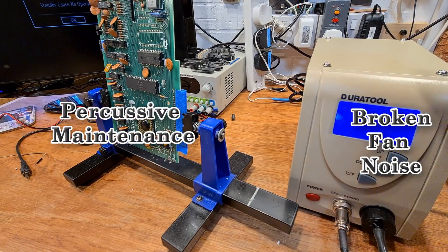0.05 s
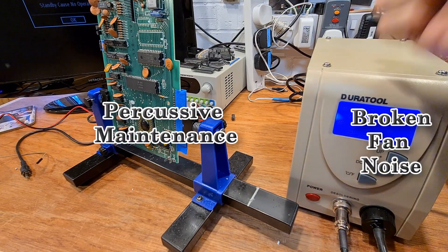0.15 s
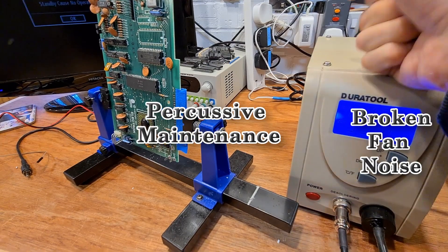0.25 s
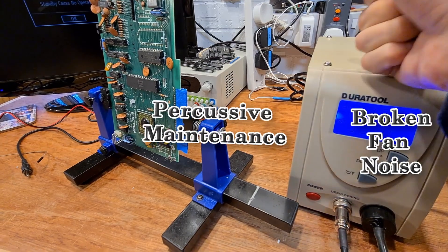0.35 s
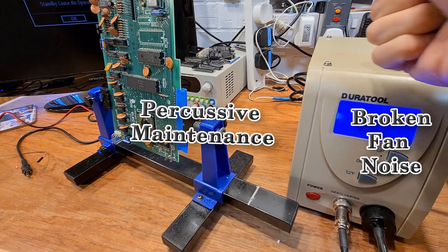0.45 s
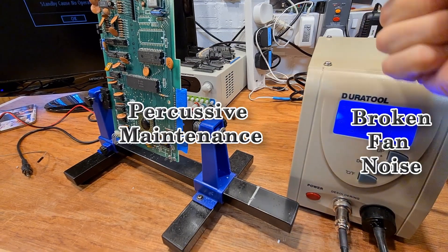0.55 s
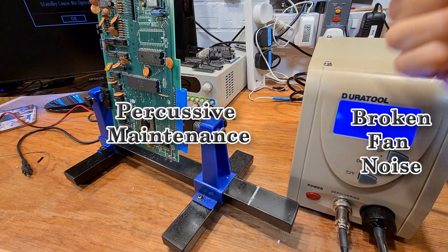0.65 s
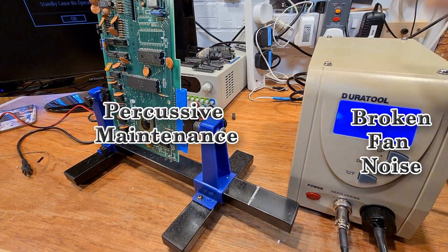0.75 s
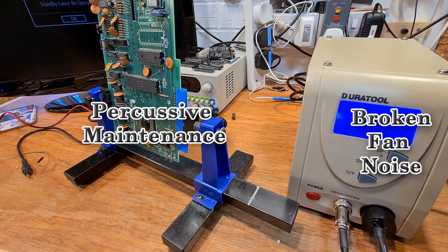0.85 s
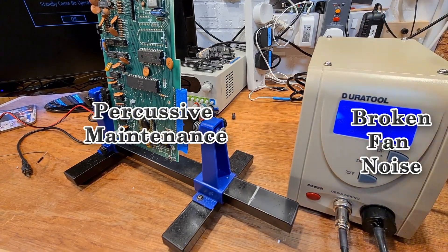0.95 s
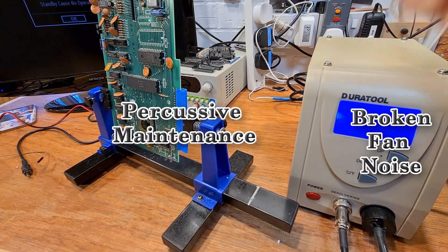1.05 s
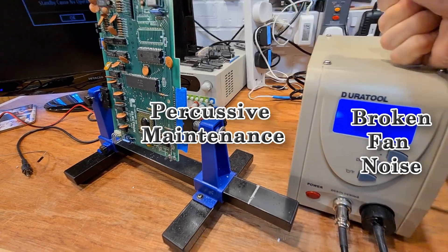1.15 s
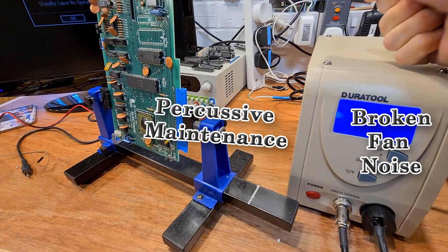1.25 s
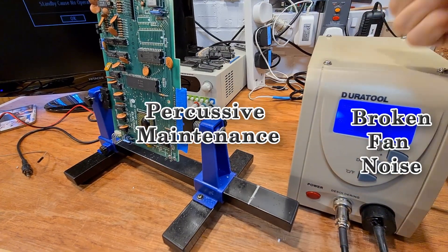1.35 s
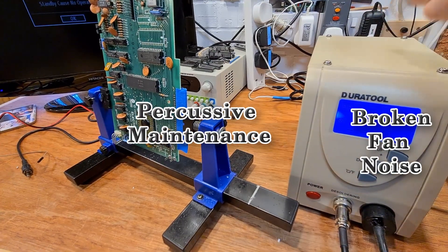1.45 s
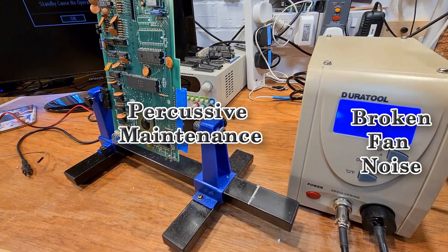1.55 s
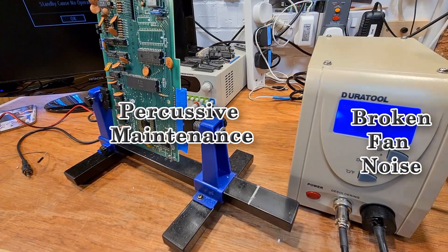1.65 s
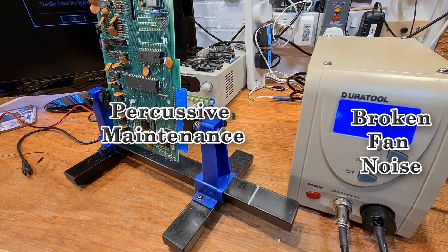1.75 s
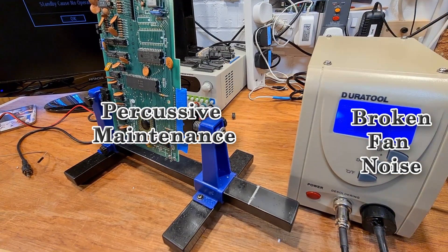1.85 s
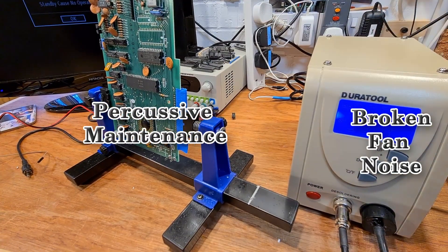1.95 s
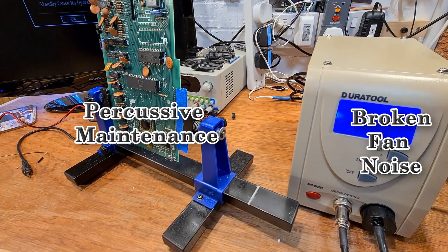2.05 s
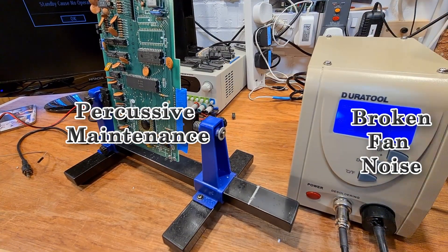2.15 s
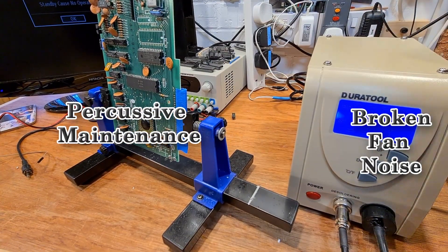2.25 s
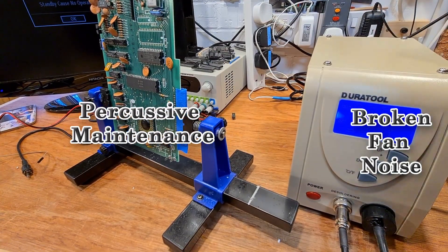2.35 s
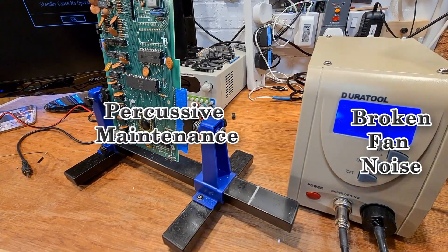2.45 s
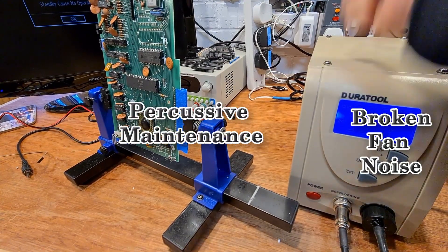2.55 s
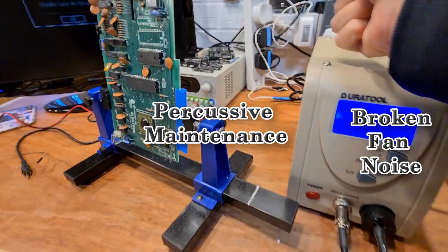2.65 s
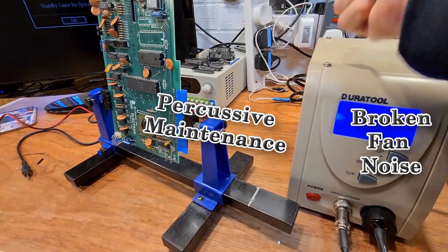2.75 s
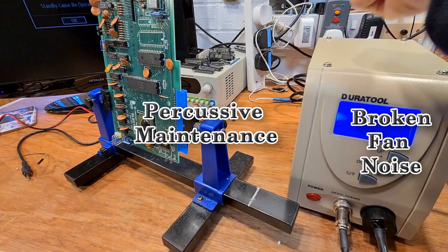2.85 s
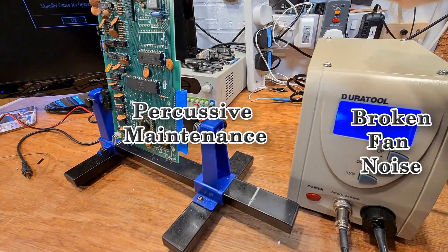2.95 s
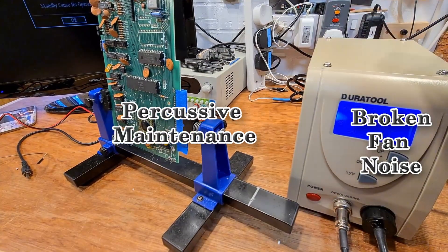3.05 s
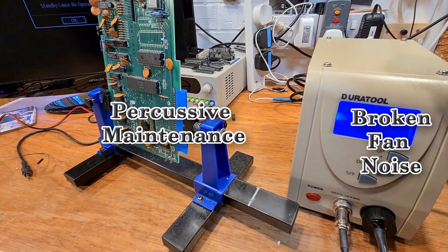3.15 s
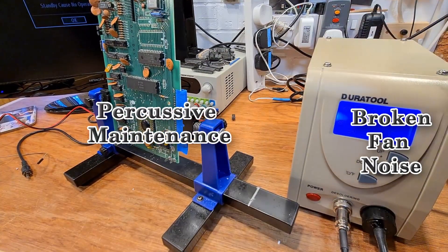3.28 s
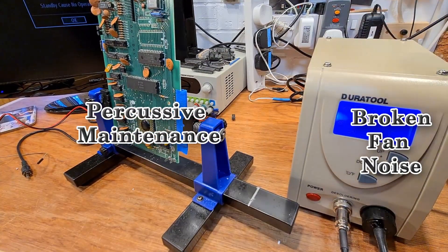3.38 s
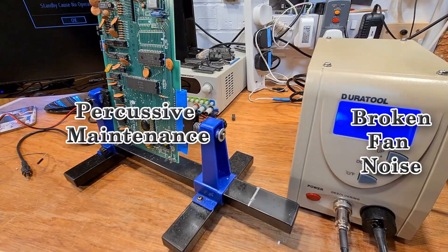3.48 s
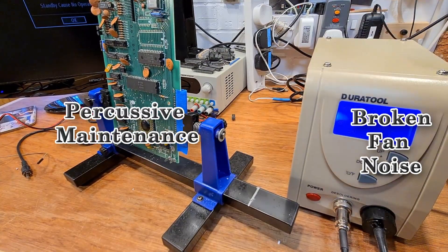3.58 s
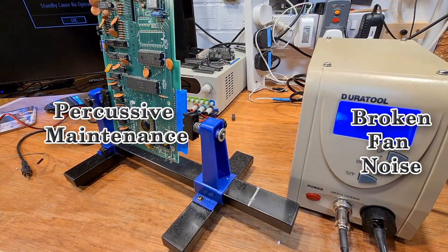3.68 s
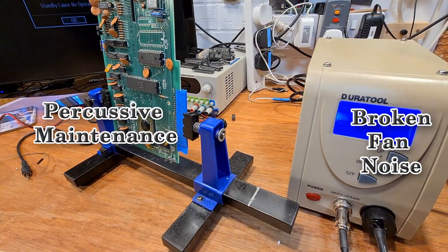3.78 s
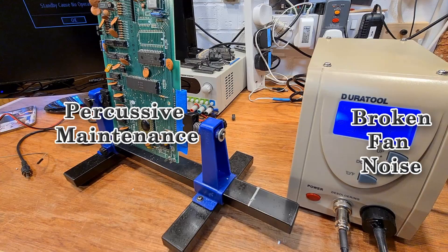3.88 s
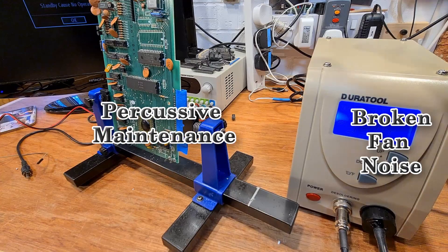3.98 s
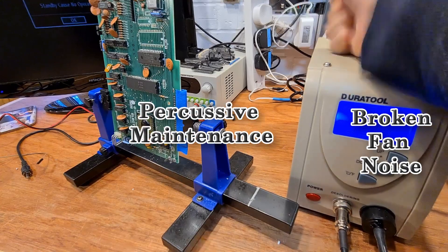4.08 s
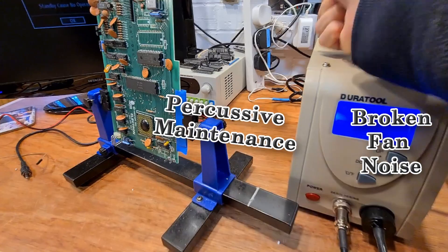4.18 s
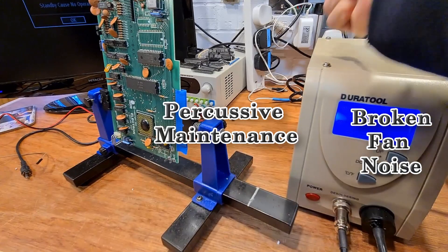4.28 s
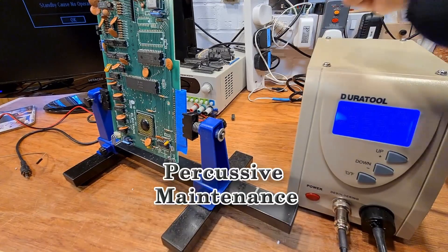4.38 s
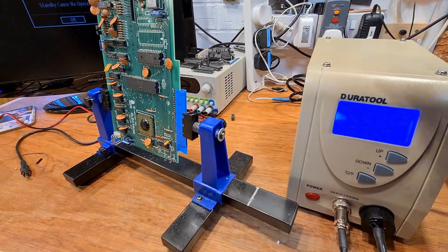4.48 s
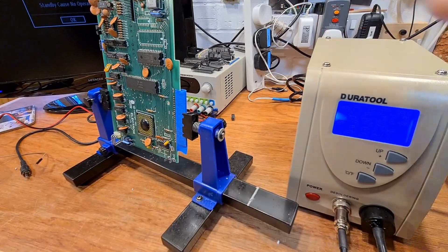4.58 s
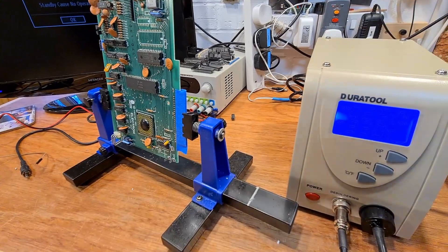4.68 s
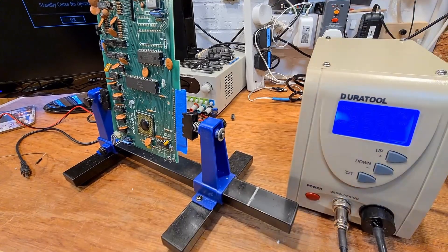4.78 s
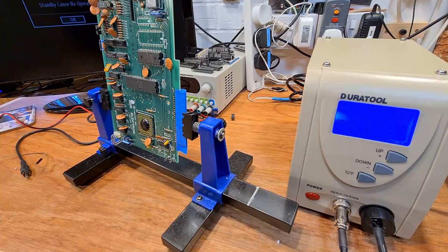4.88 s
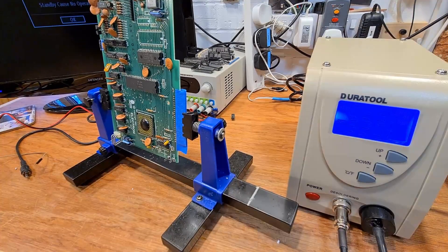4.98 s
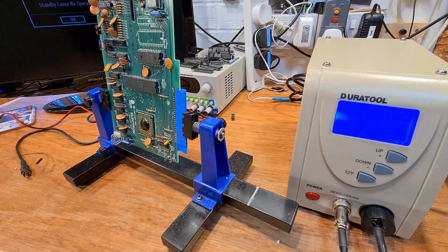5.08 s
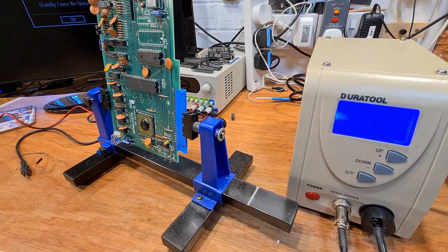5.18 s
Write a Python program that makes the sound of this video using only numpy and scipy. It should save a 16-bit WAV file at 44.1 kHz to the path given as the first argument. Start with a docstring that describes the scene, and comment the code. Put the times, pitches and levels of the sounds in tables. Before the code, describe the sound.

Close by on a workbench, a small machine's worn fan gives a steady, raspy, grinding buzz. Four fist blows land on the case, roughly one to one and a half seconds apart, each a low thud with a sharp crack and a quick clatter of panels and loose parts. After each one the fan briefly slows and its chatter shifts pitch before recovering. The bench trembles faintly after the third blow, and the buzzing never stops.

```python
"""Thumping a worn cooling fan

A fan buzzes inside a soldering station on a workbench: a blade tone, a rotor chattering in its slack
bearing, and a dry rasp once and twice a blade cycle. A fist thumps the case four times. Case and bench
boom, loose parts rattle as the case hops, and each time the fan is slowed and winds up again."""
import sys
import numpy as np
from scipy import signal
from scipy.fft import rfft, irfft, next_fast_len
from scipy.io import wavfile

SR = 44100
rng = np.random.default_rng(int(sys.argv[2]) if len(sys.argv) > 2 else 0)


def transcribe(signal):
    """Save signal, clipped to [-1, 1], as a 16-bit WAV file at the path in sys.argv[1]."""
    frames = np.atleast_2d(signal).T
    limited = np.clip(frames, -1, 1)
    pcm = np.round(limited * 32767).astype(np.int16)
    wavfile.write(sys.argv[1], SR, pcm)


N = 230290


def from_db(db):
    """Decibels to gain."""
    return 10 ** (np.asarray(db) / 20)


def rms_one(x):
    """Scale to unit power."""
    return x / np.sqrt(np.mean(x ** 2) + 1e-20)


def at_hz(points, hz):
    """Read a curve on a log-frequency axis."""
    return np.interp(np.log(hz + 1e-9), np.log(np.array(points)[:, 0]), np.array(points)[:, 1])


def pan(db):
    """Left and right gains for a level difference."""
    return from_db(np.array([[.5], [-.5]]) * db)


def drift(rate):
    """A random wobble of about unit spread, gliding to `rate` new values a second."""
    return np.interp(np.arange(N) / SR * rate, np.arange(4096), rng.standard_normal(4096))


def resonance(x, hz, width_hz):
    """The part of a sound that rings in one resonance."""
    return signal.lfilter(*signal.iirpeak(hz, hz / width_hz, fs=SR), x)


# stereo placement of noises and ringing modes: (frequency [Hz], left over right [dB])
BALANCE = [(60, -1), (200, -0.5), (600, 0.5), (1200, 0), (2400, 0), (4400, 6), (5700, 1.5), (7000, 2),
           (8500, -3.5), (10500, 7.5), (15000, 4.5)]
# stereo width of the noises: (frequency [Hz], left-right correlation [-1 to 1])
CORRELATION = [(60, 0.81), (290, 0.78), (640, 0.13), (1400, -0.82), (3000, 0.17), (15000, 0.0057)]
def noise(spectrum):
    """Coloured stereo noise at unit power, centred in the bass and wide in the treble."""
    size = next_fast_len(N)
    hz = np.arange(size // 2 + 1) * SR / size
    mid, side = rfft(rng.standard_normal((2, size)))
    alike = at_hz(CORRELATION, hz)
    pair = np.sqrt(1 + alike) * mid + np.sqrt(1 - alike) * side * [[1], [-1]]
    skirts = 1 / (1 + (spectrum[0][0] / (hz + 1)) ** 4) / (1 + (hz / spectrum[-1][0] / 2) ** 4)
    colour = skirts * from_db(at_hz(spectrum, hz))
    return rms_one(irfft(pair * colour * pan(at_hz(BALANCE, hz)), size)[:, :N])


# colour of the air bed: (frequency [Hz], relative density [dB])
AIR = [(20, -20), (40, -12.5), (64, -1), (90, -5.5), (125, -13), (165, -2.5), (250, -9.5), (300, -5),
       (380, -27.5), (520, -16.5), (630, -26.5), (780, -17), (930, -33.5), (1400, -14), (3000, -24)]
def air():
    """A steady low rush of air under everything."""
    return from_db(-47.5) * noise(AIR)


HANDOVER_S = 0.06
def after_knocks(start, rows, law):
    """A control that holds `start`; each knock fades it over to law(time since the knock, its row)."""
    out = np.full(N, float(start))
    for knock, row in zip(KNOCKS, rows):
        age = np.maximum(np.arange(N) / SR - knock[0], 0)
        out += np.minimum(age / HANDOVER_S, 1) * (law(age, *row) - out)
    return out


# wind-up after each knock: (blade rate lost [Hz], time to win half back [s],
# rise of the chatter [blade rates], decay time of the rise [s])
SPIN_UPS = [(18.4, 0.253, 0.314, 0.83), (33.2, 0.199, 0.508, 1.01), (37.4, 0.245, 0.581, 1.13),
            (34.6, 0.306, 0.591, 1.15)]
START_HZ, FREE_HZ, CHATTER_RATIO = 214.9, 217.4, 7.2
def rotor():
    """Each knock brakes the blades, which wind up again; the shaken shaft chatters faster for a while."""
    blade_hz = after_knocks(START_HZ, SPIN_UPS,
                            lambda age, lost_hz, half_s, *_: FREE_HZ - lost_hz / (1 + age / half_s))
    rise = after_knocks(0, SPIN_UPS,
                        lambda age, lost_hz, half_s, step, last_s: step * np.exp(-(age / last_s) ** 2))
    return blade_hz, blade_hz * (CHATTER_RATIO + rise)


# how each knock reseats the shaft: (rasp drive [dB], hiss drive [dB], grind boost [dB])
SEATINGS = [(-44.5, -50, 5.5), (-42, -46, -2), (-43, -46.5, -0.5), (-43, -46.3, -0.5)]
LIFT_DB, LIFT_S, BITE_DB, BITE_S = 7, 0.14, 3, 0.46
def bearing():
    """The jolt lifts the shaft off its sleeve; friction lets go, bites harder, then settles anew."""
    jolt_db = after_knocks(0, SEATINGS,
                           lambda age, *_: BITE_DB * np.exp(-age / BITE_S) - LIFT_DB * np.exp(-age / LIFT_S))
    rasp_db = after_knocks(-43, SEATINGS, lambda age, rasp, hiss, grind: rasp)
    hiss_db = after_knocks(-50.5, SEATINGS, lambda age, rasp, hiss, grind: hiss)
    grind_db = after_knocks(2, SEATINGS, lambda age, rasp, hiss, grind: grind)
    return rasp_db + jolt_db, hiss_db + jolt_db, grind_db


# narrow resonances of the fan housing: (frequency [Hz], width [Hz], boost [dB])
HOUSING = [(2972, 12.5, 20), (3293, 73, 17.5), (3936, 43, 12), (4403, 54, 14.5), (4655, 40, 14.5),
           (4886, 13, 16.5), (5325, 13, 16), (6400, 99, 5)]
def housing(x):
    """The housing rings on top of the direct sound."""
    return x + sum((from_db(db) - 1) * resonance(x, hz, width_hz) for hz, width_hz, db in HOUSING)


# dry rasp and bright hiss of the sleeve: (frequency [Hz], relative density [dB])
RASP = [(1000, -18), (1400, -51), (1650, 0.5), (2500, -3.5), (3400, -13.5), (4000, -5), (4650, -2),
        (5100, -4.5), (5600, -1), (6200, -10.5), (6900, -2.5), (7600, -3), (8100, -16.5), (10000, -10.5)]
HISS = [(8000, -7.5), (9600, -14), (10200, -4), (10900, -1), (12000, -4.5), (12700, 4.5), (13200, 1),
        (14200, 2.5), (15400, 2), (16500, -1.5)]
def friction(blade, rasp_db, hiss_db):
    """The shaft rubs hard once a blade cycle and lightly half a cycle later; its wobble adds flutter."""
    hard_rub = .85 * np.exp(5 * (np.cos(blade) - 1))
    light_rub = .3 * np.exp(6 * (-np.cos(blade) - 1))
    rasp = from_db(rasp_db + 1) * rms_one(housing(noise(RASP)))
    hiss = from_db(hiss_db + 3.5) * noise(HISS)
    flutter = from_db(1.3 * drift(50))
    return flutter * rms_one(.45 + hard_rub + light_rub) * (rasp + hiss)


# stereo placement of the fan's partials: (frequency [Hz], left over right [dB])
PARTIAL_BALANCE = [(210, 2.5), (800, 4), (1200, -12), (1900, 6), (3000, 1), (4200, 5.5)]
LEFT_LAG_S = 0.00027
def partials(table, carrier, blade, speed, flicker_db, scatter=1.8):
    """Partials whole blade rates from a carrier; the case colours them differently as speed changes."""
    out = np.zeros((2, N))
    carrier_hz, blade_hz = (np.max(phase) / (2 * np.pi) * SR / N for phase in (carrier, blade))
    for multiple, slowed_db, fast_db in table:
        hz = carrier_hz + multiple * blade_hz
        level = from_db(slowed_db + (fast_db - slowed_db) * speed + flicker_db * drift(14))
        phase = carrier + multiple * blade + scatter * rng.standard_normal()
        # the left side is farther off, and bench reflections shift the scattered partials further
        lag = 2 * np.pi * hz * LEFT_LAG_S + min(scatter, 1) * rng.standard_normal()
        out += level * pan(at_hz(PARTIAL_BALANCE, hz)) * np.cos(phase + [[-lag / 2], [lag / 2]])
    return np.sqrt(2) * out


# sidebands of the chatter and of its octave:
# (offset [blade rates], relative level slowed [dB], relative level at speed [dB])
CHATTER = [(0, -61, -61), (1, -65, -65), (2, -57, -58), (3, -58, -65), (4, -55, -57), (5, -60, -63),
           (6, -53, -54), (7, -50, -55), (8, -59, -54), (9, -57, -61), (10, -59, -61), (11, -61, -54),
           (12, -54, -58), (13, -55, -51), (14, -53, -53), (15, -50, -52), (16, -60, -63), (17, -62, -62),
           (18, -65, -58)]
CHATTER_OCTAVE = [(-1, -63, -62), (2, -62, -61), (3, -59, -62), (4, -55, -55), (5, -63, -62), (6, -51, -55),
                  (7, -53, -50), (8, -54, -59), (9, -60, -61), (10, -61, -59)]
def shaft_chatter(chatter, blade, speed):
    """The rotor chatters in its slack bearing, chopped at the blade rate; a weaker voice sits above."""
    main = partials(CHATTER, chatter, blade, speed, flicker_db=2)
    octave = partials(CHATTER_OCTAVE, 2 * chatter, blade, speed, flicker_db=2.5)
    upper = partials(CHATTER, chatter + blade * 3 / 7, blade, speed, flicker_db=2.5)
    return from_db(.5) * main + from_db(-.5) * octave + from_db(-10) * upper


# blade tone: (harmonic [blade rates], relative level slowed [dB], relative level at speed [dB])
BLADE = [(1, -30, -31), (2, -60, -73), (3, -72, -72), (4, -71, -74), (5, -74, -67), (6, -73, -63),
         (7, -70, -65), (8, -64, -62), (9, -64, -57), (10, -67, -61), (11, -69, -60), (12, -63, -62),
         (13, -64, -57), (14, -62, -55), (15, -61, -61), (16, -58, -61), (17, -62, -56), (18, -62, -61),
         (19, -64, -56), (20, -60, -60), (21, -65, -60), (22, -62, -56)]
SLOWED_HZ, AT_SPEED_HZ, NEUTRAL_RASP_DB = 204.5, 207.6, -41.5
def fan():
    """The blades hum and buzz while the worn bearing chatters, rasps and grinds in step with them."""
    blade_hz, chatter_hz = rotor()
    rasp_db, hiss_db, grind_db = bearing()
    speed = np.clip((blade_hz - SLOWED_HZ) / (AT_SPEED_HZ - SLOWED_HZ), 0, 1)
    blade_phase = 2 * np.pi * np.cumsum(blade_hz * (1 + .0005 * drift(40))) / SR
    chatter_phase = 2 * np.pi * np.cumsum(chatter_hz * (1 + .0009 * drift(90))) / SR
    hum = from_db(-0.04) * partials(BLADE[:2], 0, blade_phase, speed, flicker_db=0.1, scatter=0)
    buzz = partials(BLADE[2:], 0, blade_phase, speed, flicker_db=1.8)
    buzz += shaft_chatter(chatter_phase, blade_phase, speed)
    # the slowed buzz sings as it sweeps through a resonance
    buzz += (from_db(7.5) - 1) * resonance((1 - speed) * buzz, hz=3300, width_hz=72)
    # the harder the shaft bears on the sleeve, the louder it buzzes
    pressure = from_db(1.23 * np.clip(rasp_db - NEUTRAL_RASP_DB, -4, 3))
    shaft = pressure * buzz + friction(blade_phase, rasp_db, hiss_db)
    grind = (from_db(grind_db) - 1) * resonance(shaft, hz=2100, width_hz=340)
    return hum + shaft + grind


def impulses(times, db):
    """One impulse for each contact."""
    out = np.full(N, 1e-18)
    out[np.round(times * SR).astype(int)] = from_db(db)
    return out


def fade(x, t60):
    """Each impulse leaves an exponential tail."""
    return signal.lfilter([1], [1, -from_db(-60 / (t60 * SR))], x)


def burst(times, db, spectrum, rise_s, t60, tail_db, tail_t60):
    """Many close modes struck at once: noise that dies fast, then lingers in the room."""
    energy = impulses(times, 2 * db)
    power = fade(energy, t60 / 2) + from_db(2 * tail_db) * fade(energy, tail_t60 / 2)
    pole = np.exp(-1 / (rise_s * SR))
    softened = signal.lfilter([1 - pole], [1, -pole], power)
    return np.sqrt(softened) * noise(spectrum)


def strike(times, db, modes, spread, vary_db=1):
    """Each contact rings each mode with its own strength; the left lags by twice `spread` radians."""
    out = np.zeros((2, N))
    for hz, mode_db, t60 in modes:
        pole = from_db(-60 / (t60 * SR)) * np.exp(2j * np.pi * hz / SR)
        hits = impulses(times, db + mode_db + vary_db * rng.standard_normal(len(times)))
        ring = signal.lfilter([1], [1, -pole], hits)
        sides = (ring * np.exp(1j * spread * np.array([[-1], [1]]))).real * pan(at_hz(BALANCE, hz))
        # the soft fist needs part of a cycle to set each mode moving
        out += signal.sosfilt(signal.butter(2, 2 * hz, fs=SR, output="sos"), sides)
    return out


def shudder(start_s=2.75, hz=60, t60=2.94):
    """After the third blow something on the bench keeps trembling."""
    return strike(np.array([start_s]), -36, [(hz, 0, t60)], spread=0.14, vary_db=-0.5)


# the fist's blows: (time [s], lead of the knuckles [s], first hop [s], then the drive of each layer:
# case [dB], bench [dB], lid [dB], crash [dB], panels [dB], crack [dB], rattle [dB])
KNOCKS = [(0.312, 0.00098, 0.017, -12, -30.5, -30, -37, -36.5, -25, -32),
          (1.2138, 0.011, 0.017, -4, -20, -22.5, -13.5, -18.5, -23, -24),
          (2.697, 0.004, 0.022, -6, -15.5, -19, -20, -31.5, -25.5, -21),
          (4.182, 0.0009, 0.024, 0.5, -15, -12.5, -14.5, -25.5, -21, -19.5)]
HOPS, HOP_SHRINK, TOUCH_DB = 4, 0.8, -8.5
def contacts():
    """Contact times: the knuckles' touch, the full blow, then landings after ever shorter hops."""
    blow_s, lead_s, hop_s = np.transpose(KNOCKS)[:3]
    landings = blow_s + hop_s * np.cumsum(HOP_SHRINK ** np.arange(HOPS))[:, None]
    return np.concatenate([blow_s - lead_s, blow_s, landings.ravel()])


def strengths(blow_db, landing_db, loss_db=5):
    """Contact levels: a light touch, the blow, and landings each `loss_db` weaker than the last."""
    landings = landing_db + np.zeros(len(KNOCKS)) - loss_db * np.arange(HOPS)[:, None]
    return np.concatenate([blow_db + TOUCH_DB, blow_db, landings.ravel()])


# loose parts, from dull to bright: (frequency [Hz], relative density [dB])
CLACK = [(700, -5), (1600, 6), (2300, 0.5), (2900, -2), (3700, -0.5), (4300, -2), (5000, -0.5), (9000, -31)]
CLICK = [(2000, -51), (4300, 5), (5400, -5), (6200, 0), (7000, 3), (8500, -9), (11000, -10.5), (16000, -36)]
TICK = [(7000, -28), (10500, -1.5), (12500, 0), (15500, -1.5), (17000, -1)]
# hard plastic shell: (frequency [Hz], relative level [dB], t60 [s])
SHELL_MODES = [(2800, -6.5, 0.042), (3230, -4.5, 0.026), (3630, -5.5, 0.029)]
def rattle():
    """Under the fist and at every landing the shell cracks and loose parts clack, click and tick."""
    crack_db, rattle_db = np.transpose(KNOCKS)[-2:]
    times = contacts()
    clack = burst(times, strengths(crack_db + 1.5, rattle_db - 1, loss_db=1), CLACK,
                  rise_s=0.00051, t60=0.015, tail_db=-10, tail_t60=0.12)
    click = burst(times, strengths(crack_db - 5, rattle_db - 1.5, loss_db=1), CLICK,
                  rise_s=0.0009, t60=0.017, tail_db=-10, tail_t60=0.13)
    tick = burst(times, strengths(crack_db + 5, rattle_db - 4.5, loss_db=1), TICK,
                 rise_s=0.0012, t60=0.0097, tail_db=-10.5, tail_t60=0.077)
    crack = strike(times, strengths(crack_db + 5.5, rattle_db - 6.5, loss_db=1), SHELL_MODES,
                   spread=0.73, vary_db=2.5)
    return clack + crack + click + tick


# bench top, hollow case, lid and thin side panels: (frequency [Hz], relative level [dB], t60 [s])
BENCH_MODES = [(43.6, -12.5, 0.82), (62.7, 3, 0.34), (76, 3, 0.24), (97.8, -4.5, 0.34), (107.7, 1, 0.11)]
CASE_MODES = [(160.6, -10, 0.23), (199.3, 0.5, 0.13), (234.5, 1, 0.14), (257, -7.5, 0.23)]
LID_MODES = [(315.7, 2.5, 0.18), (371.6, -1.5, 0.19), (390, -6, 0.24), (470, -1.5, 0.054),
             (552.4, -12.5, 0.19)]
PANEL_MODES = [(680, -11, 0.16), (742, 2, 0.19), (983, -9, 0.059), (1066, 1, 0.13), (1099, 2.5, 0.13),
               (1115, 1, 0.15), (1288, -2, 0.16), (1374, -21, 0.44)]
# noisy crash of the panels: (frequency [Hz], relative density [dB])
PANEL_CRASH = [(200, 15), (450, -2.5), (800, -10), (1100, -4), (1600, -4.5), (2400, -10.5), (6000, -49)]
BOOM_LAG_S = 0.001212  # the body gives way just after the crack
def thumps():
    """The soft fist sets bench and case booming, the lid knocking and the thin panels clattering."""
    case_db, bench_db, lid_db, crash_db, panel_db, _, rattle_db = np.transpose(KNOCKS)[3:]
    times = contacts() + BOOM_LAG_S
    bench = strike(times, strengths(bench_db, landing_db=-28), BENCH_MODES, spread=0.25)
    case = strike(times, strengths(case_db - 7, landing_db=-24), CASE_MODES, spread=0.084)
    lid = strike(times, strengths(lid_db, rattle_db - 2.5), LID_MODES, spread=0.51)
    panels = strike(times, strengths(panel_db - 3.5, rattle_db - 14.5), PANEL_MODES, spread=0.78)
    crash = burst(times, strengths(crash_db - 1.5, rattle_db - 6), PANEL_CRASH,
                  rise_s=0.0063, t60=0.18, tail_db=-5, tail_t60=0.25)
    return bench + case + lid + panels + crash


def scene():
    """The fan over a bed of air, and the blows on its case."""
    return fan() + air() + thumps() + rattle() + shudder()


def record(dry):
    """The microphone drops the deepest bass, the hardest peak is rounded off and the top is cut."""
    thinned = signal.sosfilt(signal.butter(3, 32, "high", fs=SR, output="sos"), dry)
    rounded = thinned / (1 + thinned ** 6) ** (1 / 6)
    return signal.sosfilt(signal.ellip(12, .2, 80, 15900, fs=SR, output="sos"), rounded)


dry = scene()
out = record(dry)
transcribe(out)
```